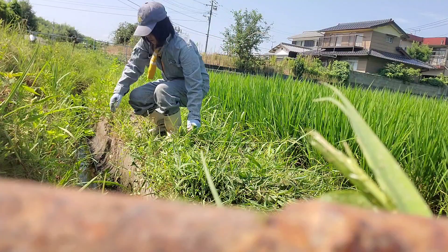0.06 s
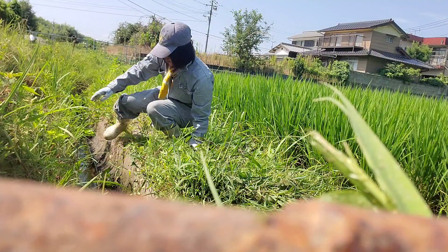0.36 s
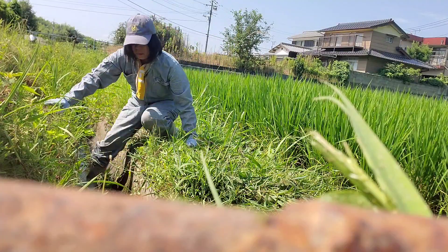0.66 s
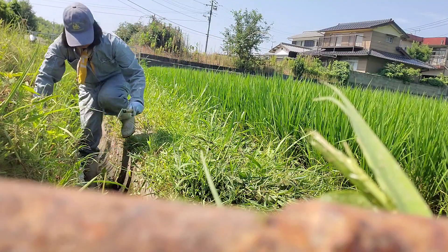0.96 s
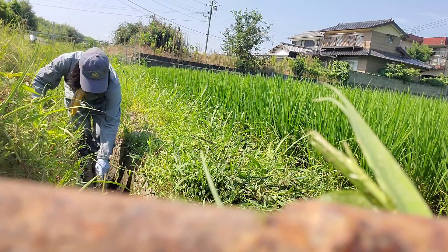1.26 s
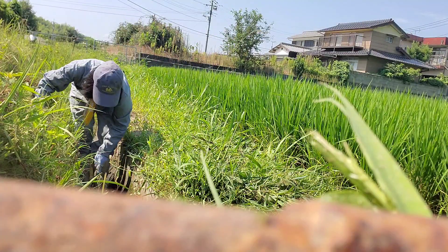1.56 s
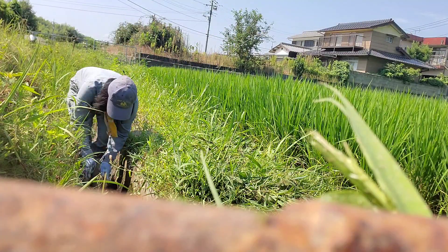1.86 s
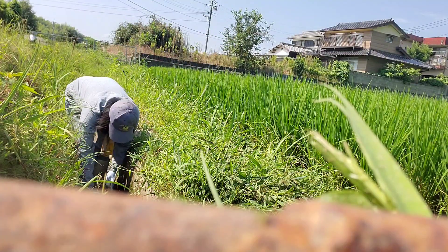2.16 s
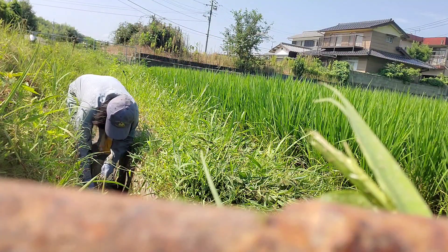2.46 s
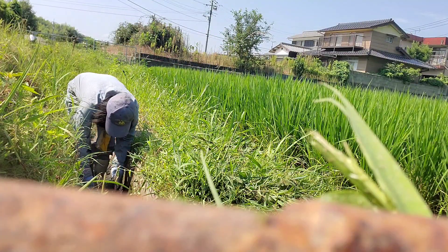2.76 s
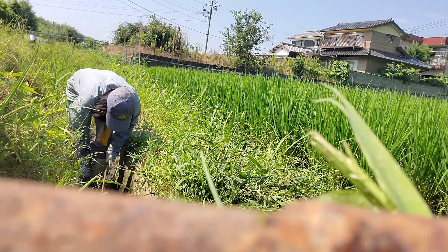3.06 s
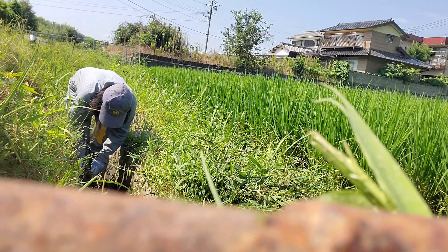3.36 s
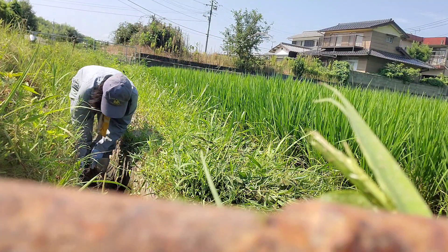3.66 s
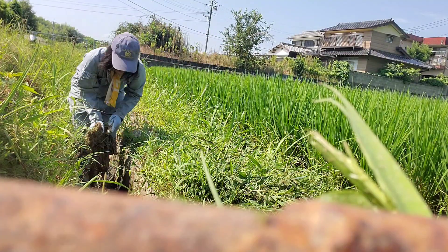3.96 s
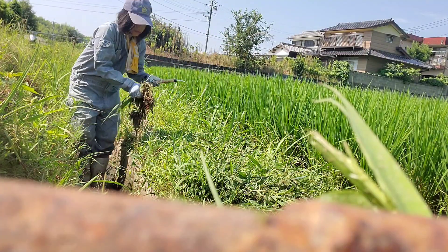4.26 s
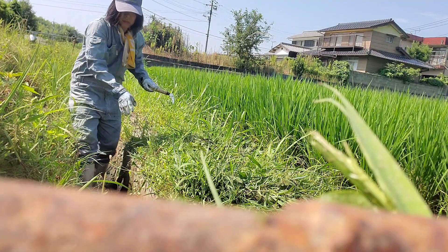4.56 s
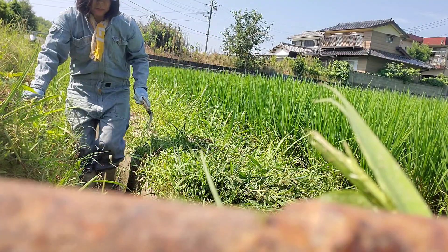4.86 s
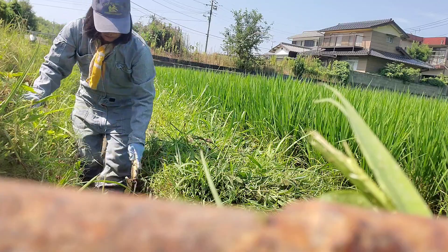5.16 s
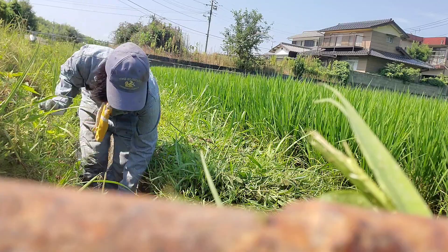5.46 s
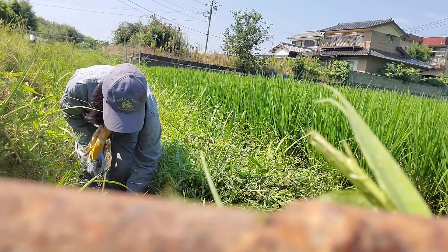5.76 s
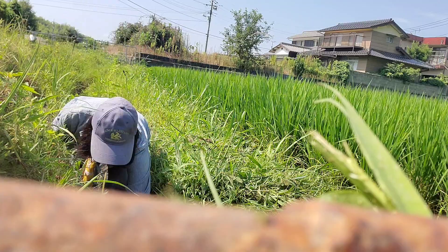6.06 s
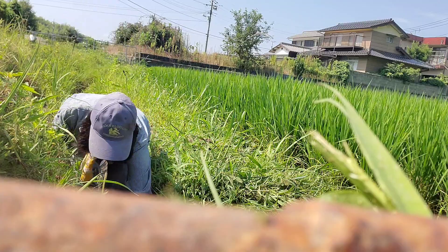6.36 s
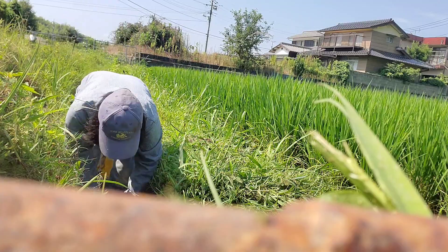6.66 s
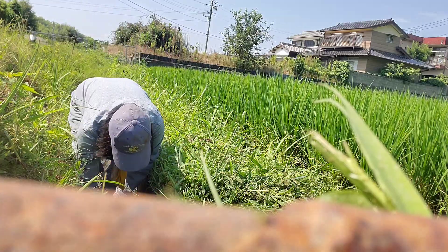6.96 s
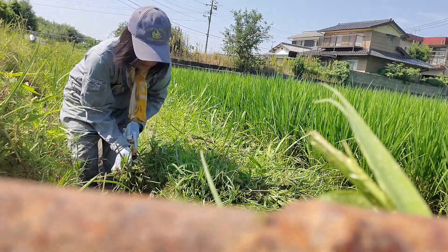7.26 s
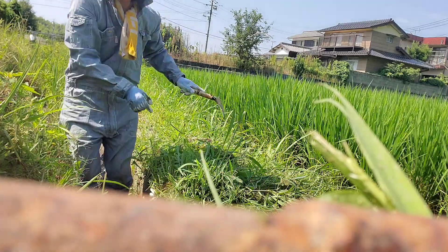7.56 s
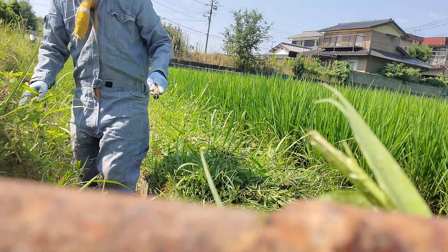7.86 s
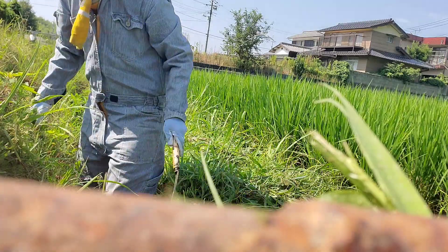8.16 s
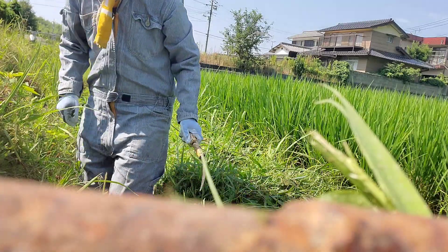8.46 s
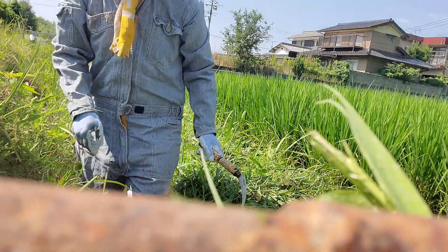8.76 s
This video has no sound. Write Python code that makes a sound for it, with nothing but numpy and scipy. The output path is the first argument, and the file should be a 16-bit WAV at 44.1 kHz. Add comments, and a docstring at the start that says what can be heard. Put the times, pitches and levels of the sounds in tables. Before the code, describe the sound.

A soft, high cicada chorus hisses throughout in wide stereo, with a cricket rasping in quick pulses and a faint town rumble far off. A few metres away, slightly left, a sickle works in a muddy ditch with almost no echo. After a faint rustle and a soft boot thud around 1 second, short tearing cuts and crisp stalk snaps begin at 1.5 seconds. The loudest cluster comes at 2.4 seconds with a wet squelch, and another sharp snap at 3.5. From 4 to 5.4 seconds there are only quiet sloshes, bubbly pops and dull thuds. Snaps return at 5.6 and 5.9, followed by longer rips and a strong double snap at 6.8. Small squelches follow, then lighter snaps at 8 and 8.5 with soft muddy steps. One cicada's thin whine swells from 1.3 to 2.9 seconds and again from 8.

```python
"""A sickle clears a muddy ditch beside a rice field, a few metres from a stereo pair in the open air.
Each pull tears wet stalks and crackles the leaves, and thick stalks snap with a brief ring.
Boots thud on the soft bank and slosh through the mud, where air pockets open with a squelch.
Cicadas hiss and whine all around, a bush cricket rasps its wings about eleven times a second,
and a far town rumbles underneath."""
import sys
import numpy as np
from scipy import signal
from scipy.fft import rfft, irfft, next_fast_len
from scipy.io import wavfile

SR = 44100
rng = np.random.default_rng(int(sys.argv[2]) if len(sys.argv) > 2 else 0)


def digitize_waveform(pressure):
    """Quantize a signal to 16-bit integers and store it at the path in sys.argv[1].

    Rows of a 2-D input are taken as channels; values are limited to [-1, 1].
    """
    field = np.atleast_2d(pressure).T
    bounded = np.clip(field, -1, 1)
    quanta = np.round(bounded * 32767).astype(np.int16)
    wavfile.write(sys.argv[1], SR, quanta)


N = 392931
TIME = np.arange(N) / SR

# spectrum of the cicada chorus across the field: (frequency [Hz], gain [dB])
CHORUS_SPECTRUM = [(1200, -29), (1800, -18), (2350, -4.5), (3050, -2), (3650, -4), (4300, -2.5),
                   (4950, -1.5), (5900, -12), (7100, -10), (8100, -6.5), (9200, -14), (10300, -20.5),
                   (12500, -23), (15500, -26.5)]
# slow swell of that chorus: (time [s], base level [dB])
CHORUS_SWELL = [(0.0, -57.5), (0.79, -58), (2.38, -58.5), (2.6, -57), (3.79, -56), (8.9, -57)]
# buzz of the cicada nearest the microphones: (time [s], level [dB], centre [Hz])
NEAR_BUZZ = [(0, -63.5, 8140), (1.3, -67.5, 8040), (2.8, -66, 8240), (3.8, -62, 8910), (5.2, -64.5, 8670),
             (6.1, -62, 7900), (7.3, -66.5, 7900), (8.9, -73, 8100)]
# single cicadas standing out of the chorus: (pitch [Hz], width [Hz], level [dB])
SOLO_VOICES = [(3016, 95, -67), (3267, 43, -69), (4710, 93, -73)]
# the bush cricket's song: (time [s], chirp rate [1/s], relative level [dB])
CRICKET_SONG = [(0, 10, -7.5), (3, 12.3, 3.5), (4.8, 10.4, 5.5), (6.4, 10.8, -1), (7.6, 11.9, 1.5),
                (8.9, 11.3, -14)]
# resonances of the cricket's wings: (frequency [Hz], width [Hz], gain [dB])
WING_MODES = [(5150, 800, 0), (9350, 1200, -4.5), (12000, 5000, -22)]
# spectrum of the town, heard from far off: (frequency [Hz], gain [dB])
TOWN_SPECTRUM = [(20, -2), (42, -11.5), (64, -3.5), (85, -1), (125, -7.5), (220, -12), (380, -15),
                 (550, -23.5), (800, -45.5), (1300, -22.5), (2500, -67)]
# rise and fall of the town: (time [s], rumble gain [dB], drone gain [dB])
TOWN_SWELL = [(0, -2, 0.5), (1.3, 0.5, 5.5), (2.8, -0.5, 5), (3.6, -0.5, -1), (8.9, -0.5, -15.5)]
# spectra of wet mud, tearing stalks and crackling leaves: (frequency [Hz], gain [dB])
MUD_SPECTRUM = [(110, 4), (260, 5), (420, 1.5), (600, 0.5), (1050, 3), (1400, 1), (1750, 7.5), (2300, -1),
                (3500, -32)]
STALK_SPECTRUM = [(1300, -36), (2000, -16), (2700, -4.5), (3300, -3.5), (4000, 4), (4700, -3.5), (5300, -3),
                  (6100, -21.5), (8000, -38)]
LEAF_SPECTRUM = [(4500, -29), (6200, -1), (7800, -9), (9000, -9), (10000, -4), (11500, -2), (13000, -9),
                 (15500, -7.5)]
# the sickle draws through a tuft: (time of peak [s], length [s], stalks [dB], mud [dB], leaves [dB])
SICKLE_PULLS = [(0.803, 0.029, -57.5, -64.5, -57), (1.574, 0.059, -34.5, -45.5, -47),
                (1.908, 0.044, -39, -50, -51.5), (2.455, 0.067, -33.5, -48.5, -46.5),
                (3.003, 0.046, -42, -55, -47.5), (3.246, 0.068, -46.5, -56, -55.5),
                (3.748, 0.037, -44, -62, -56), (5.748, 0.034, -46.5, -56, -63.5),
                (5.908, 0.049, -41.5, -55, -50.5), (6.322, .11, -34, -47, -51.5),
                (6.627, 0.18, -33.5, -46, -52.5), (6.841, 0.054, -33.5, -45.5, -47),
                (8.197, 0.033, -53.5, -75, -68)]
# boots and clods land on soft ground: (time [s], level [dB], length [s], centre [Hz])
GROUND_THUDS = [(1.026, -54.5, 0.063, 158), (1.598, -54.5, 0.089, 217), (1.622, -47.5, .051, 65),
                (4.747, -46, .03, 157), (5.203, -53, 0.065, 108), (5.311, -49, 0.053, 93),
                (6.603, -44.5, 0.031, 188), (8.183, -56, 0.023, 195), (8.494, -63, .064, 185),
                (8.867, -52.5, 0.045, 209)]
# a small cicada's thin calls: (start [s], end [s], level at the end [dB], pitch [Hz])
WHINE_CALLS = [(1.302, 2.897, -63.5, 6320), (7.953, 8.95, -64, 6500)]
# boots and hands work the wet mud: (time of peak [s], length [s], mud level [dB])
MUD_SLOSHES = [(1.429, 0.077, -66.5), (1.718, 0.13, -69.5), (1.995, 0.057, -66.5), (2.655, 0.061, -61),
               (2.805, 0.094, -61.5), (3.053, 0.074, -57.5), (4.42, .12, -64), (4.762, 0.099, -55.5),
               (5.72, 0.14, -65.5), (5.997, 0.12, -60.5), (6.472, .025, -60), (6.882, 0.083, -60.5),
               (7.491, .18, -67), (8.528, 0.11, -61.5), (8.857, 0.06, -61)]
# the largest air pockets opening in mud and ditch water: (time [s], level [dB], pitch [Hz])
LARGE_POCKETS = [(1.415, -48.5, 694), (1.436, -44, 328), (1.762, -53, 960), (1.998, -46, 383),
                 (2.420, -25, 1189), (2.440, -25, 1076), (2.452, -30.5, 408), (2.859, -50, 432),
                 (2.990, -34, 249.4), (3.166, -53, 1330), (3.475, -47.5, 357), (4.385, -54, 765),
                 (4.633, -52, 503), (4.704, -43, 288), (4.746, -42, 1270), (5.162, -55, 592),
                 (5.799, -48.5, 805), (5.866, -41, 1490), (5.975, -44.5, 317), (6.008, -48, 1120),
                 (6.877, -45, 1300), (7.402, -48.5, 1190), (7.498, -44, 1004), (7.656, -52, 1085),
                 (8.489, -37.5, 271), (8.551, -45, 770)]
# the blade chops a thick stalk: (time [s], level [dB], ring [Hz], mud [dB], leaves [dB])
STALK_SNAPS = [(1.552, -32, 3500, -44, -58), (1.878, -28.5, 4100, -35.5, -42),
               (1.905, -22, 3870, -44.5, -48), (2.431, -16.5, 4880, -35, -43), (2.447, -17, 4200, -40, -40),
               (2.971, -34, 3930, -44.5, -36.5), (3.451, -16.5, 5250, -32, -34),
               (3.462, -19.5, 5750, -43, -39), (3.670, -34, 6160, -68, -38), (5.576, -22.5, 4600, -42, -66),
               (5.871, -26, 4700, -50, -48), (6.800, -18, 3900, -41, -57), (6.824, -17, 4000, -57, -57),
               (8.016, -30, 4520, -55, -54), (8.486, -29.5, 4070, -41.5, -61)]


def undb(db):
    """Decibels to gain."""
    return 10 ** (np.asarray(db) / 20)


def unit(x):
    """Scale to rms 1."""
    return x / np.sqrt(np.mean(x ** 2) + 1e-20)


def curves(table):
    """The columns of a table, joined by straight lines in time."""
    times, *columns = np.transpose(table)
    return [np.interp(TIME, times, column) for column in columns]


def pan(db):
    """Gains that make the left microphone louder than the right by db."""
    return undb(np.array([[db], [-db]]) / 2)


def colour(x, spectrum):
    """Filter by a spectrum of (frequency [Hz], gain [dB]) points."""
    hz, db = np.transpose(spectrum)
    size = next_fast_len(x.shape[-1])
    bins_hz = np.maximum(np.fft.rfftfreq(size, 1 / SR), 1)
    gain = undb(np.interp(np.log(bins_hz), np.log(hz), db))
    return irfft(rfft(x, size) * gain, size)[..., :x.shape[-1]]


def low_cut(x, hz, order=1):
    """Roll off the bass below hz."""
    return signal.sosfilt(signal.butter(order, hz, "high", fs=SR, output="sos"), x)


def resonate(x, hz, width_hz):
    """A resonance applied twice, for steep skirts."""
    b, a = signal.iirpeak(hz, hz / width_hz, SR)
    return signal.lfilter(b, a, signal.lfilter(b, a, x))


def wander(rate_hz):
    """A random curve with a spread near 1."""
    steps = rng.standard_normal(2048)
    return np.interp(TIME * rate_hz, np.arange(len(steps)), steps)


def narrow_noise(hz, width_hz):
    """Stereo noise in a narrow band around a moving pitch."""
    lowpass = signal.butter(2, width_hz / 2, fs=SR, output="sos")
    slow = signal.sosfilt(lowpass, rng.standard_normal((2, 2, N)))
    carrier = np.exp(2j * np.pi * np.cumsum(hz) / SR)
    return unit(np.real((slow[0] + 1j * slow[1]) * carrier))


def grains(per_s, spread_db, band_hz, q, pitches=16):
    """Tiny breaks at random moments, a few large among many small, each ringing at one of the pitches."""
    sizes = undb(spread_db * np.minimum(rng.exponential(size=N), 4))
    breaks = (rng.random(N) < per_s / SR) * sizes * rng.choice([-1, 1], N)
    pitch = rng.integers(pitches, size=N)
    return sum(signal.lfilter(*signal.iirpeak(hz, q, SR), breaks * (pitch == k))
               for k, hz in enumerate(np.geomspace(*band_hz, pitches)))


def add(out, s, sound):
    """Mix a sound in at s seconds."""
    start = max(int(s * SR), 0)
    part = sound[..., :max(N - start, 0)]
    out[..., start:start + part.shape[-1]] += part


def cicada_chorus(boost_db=2.5, flutter_db=1.6, bands=9):
    """Cicadas all round the microphones flutter apart, deep ones to the right, shrill ones to the left."""
    size = next_fast_len(N)
    spectrum = rfft(unit(colour(rng.standard_normal((2, N)), CHORUS_SPECTRUM)), size)
    hz = np.fft.rfftfreq(size, 1 / SR)
    centres_hz = np.linspace(2300, 6100, bands)
    voices = 0
    for k, centre in enumerate(centres_hz):
        band = irfft(spectrum * np.interp(hz, centres_hz, np.eye(bands)[k]), size)[:, :N]
        side_db = np.interp(centre, [2800, 4000, 6000], [-1.2, 3.2, 2.0])
        flutter = undb(flutter_db * wander(30) * (k < bands - 1))  # the top band stays smooth
        voices += band * pan(side_db) * flutter
    swell_db, = curves(CHORUS_SWELL)
    return undb(swell_db + boost_db) * voices


def near_cicada(tymbal_hz=93.5, depth=0.6):
    """The nearest cicada buzzes, pulsing with its tymbals."""
    db, hz = curves(NEAR_BUZZ)
    pulse_hz = tymbal_hz * (1 + 0.002 * wander(3.3))
    pulse = 1 + depth * np.sin(2 * np.pi * np.cumsum(pulse_hz) / SR)
    buzz = narrow_noise(hz, 1800) + 0.5 * narrow_noise(hz, 140)
    return undb(db) * unit(pulse * buzz)


def solo_cicadas():
    """A few cicadas swell and waver on their own notes."""
    return sum(undb(db + 1.8 * wander(3)) * narrow_noise(hz * (1 + 0.012 * wander(7)), width_hz)
               for hz, width_hz, db in SOLO_VOICES)


def bush_cricket(db=-64.5):
    """Near centre, each wing stroke rasps across the file in a short chirp, some weaker than others."""
    rate_hz, effort_db = curves(CRICKET_SONG)
    strokes = np.cos(np.pi * np.cumsum(rate_hz) / SR) ** 2
    rasp = rng.standard_normal((2, N))
    wings = sum(undb(mode_db) * resonate(rasp, hz, width_hz) for hz, width_hz, mode_db in WING_MODES)
    return undb(db + effort_db + 3.2 * wander(9)) * unit(wings * strokes) * pan(0.6)


def far_town(rumble_db=-68, drone_db=-67, drone_hz=63):
    """A wide, distant rumble, leaning left, with a low drone that comes and goes."""
    rumble_swell_db, drone_swell_db = curves(TOWN_SWELL)
    rumble_gain = undb(rumble_db + rumble_swell_db + 0.92 * wander(3.3))
    rumble = rumble_gain * unit(colour(rng.standard_normal((2, N)), TOWN_SPECTRUM))
    drone = undb(drone_db + drone_swell_db) * narrow_noise(np.full(N, drone_hz), 12)
    return (rumble + drone) * pan(2.8)


def ditch(sound, pan_db, scatter_db=4.5, scatter_s=0.0038, lag_s=0.00012, sway_hz=12):
    """The path to the microphones, the left one nearer: banks and shaken grass scatter the sound."""
    t = TIME[:SR // 50]
    sound = np.pad(sound, (0, len(t)))
    age = np.arange(len(sound)) / SR
    direct = np.array([sound, np.interp(age - lag_s, age, sound)])
    paths = unit(rng.standard_normal((2, 2, len(t))) * np.exp(-t / scatter_s)) / np.sqrt(len(t))
    paths = low_cut(paths, 900)  # long waves pass straight through
    one, other = (signal.fftconvolve(direct, path, axes=-1)[:, :len(sound)] for path in paths)
    sway = 2 * np.pi * sway_hz * age  # the echoes change as the grass moves
    heard = direct + undb(scatter_db) * (np.cos(sway) * one + np.sin(sway) * other)
    return heard * np.std(sound) / np.std(heard, axis=1, keepdims=True) * pan(pan_db)


def mud_froth(rest_db=-85.5, stir_db=-22, settle_s=0.27, flicker_db=5.5):
    """Tiny bubbles seep from the mud, froth up around each slosh, then settle."""
    stir = sum(undb(db + stir_db) * np.exp(-np.abs(TIME - s) / settle_s) for s, _, db in MUD_SLOSHES)
    bubbles = unit(colour(grains(per_s=260, spread_db=2.5, band_hz=(280, 1900), q=15), MUD_SPECTRUM))
    flicker = undb(flicker_db * wander(14))
    return ditch(bubbles * (undb(rest_db) + stir) * flicker, pan_db=1.5)[:, :N]


def work_textures():
    """Wet mud, tearing stalks and crackling leaves, uneven as the blade catches and slips."""
    mud = colour(grains(per_s=1400, spread_db=3.4, band_hz=(223, 2008), q=7.6), MUD_SPECTRUM)
    stalks = colour(grains(per_s=5000, spread_db=3.2, band_hz=(1900, 6200), q=11), STALK_SPECTRUM)
    leaves = colour(grains(per_s=1800, spread_db=5.2, band_hz=(5800, 15500), q=6), LEAF_SPECTRUM)
    return np.array([mud, stalks, leaves]) * undb(1.5 * wander(160))


def tear(textures, envelope, levels_db):
    """Mud, stalks and leaves under one envelope, each at its own rms level."""
    first = int(rng.random() * (N - SR))
    return sum(undb(db) * unit(texture[first:first + len(envelope)] * envelope)
               for db, texture in zip(levels_db, textures))


def pull(peak_s, length_s, rise_share=0.63, grip=0.1, level_off_s=0.11):
    """Start time and envelope of a pull: tension builds, then lets go; long pulls level off."""
    tension = np.interp(np.linspace(0, 1, int(length_s * SR)), [0, rise_share, 1], [grip, 1, 0])
    return peak_s - rise_share * length_s, np.tanh(tension * length_s / level_off_s)


def sickle_cuts(textures):
    """A few metres off, left of centre, the blade tears through a tuft of stalks and leaves."""
    out = np.zeros((2, N))
    mud, stalks, leaves = textures
    surface = low_cut(mud, 550)  # only the surface of the mud is stirred
    for s, length_s, stalks_db, mud_db, leaves_db in SICKLE_PULLS:
        start, envelope = pull(s, length_s)
        cut = tear((surface, stalks, leaves), envelope, (mud_db, stalks_db, leaves_db))
        add(out, start, ditch(cut, pan_db=3.5))
    return out


def thuds(stereo_spread=1.3):
    """To the left, soft ground takes a weight with a short, dull push that spreads through the bank."""
    out = np.zeros((2, N))
    for s, db, length_s, hz in GROUND_THUDS:
        age = TIME[:SR // 4] / length_s
        envelope = age * np.exp(-3 * age)
        push = rng.standard_normal(len(age)) + stereo_spread * rng.standard_normal((2, len(age)))
        earth = unit(resonate(push, hz, 0.64 * hz) * envelope)
        crest = envelope.max() / np.sqrt(np.mean(envelope ** 2))
        add(out, s, undb(db) * earth / crest)
    return out * pan(4.7)


def whining_cicada(swell_db_per_s=4.5, fade_s=0.15):
    """A small cicada swells on one thin note, then breaks off."""
    out = 0
    for start, end, db, hz in WHINE_CALLS:
        gate = np.interp(TIME, [start, start + fade_s, end, end + fade_s], [0, 1, 1, 0])
        swell_db = swell_db_per_s * np.minimum(TIME - end, 0)
        out += gate * undb(db + swell_db) * narrow_noise(hz * (1 + 0.003 * wander(8)), 300)
    return out


def sloshes(textures, stalks_db=2.5, leaves_db=-8):
    """A boot or hand drags through the mud and brushes the plants beside it."""
    out = np.zeros((2, N))
    for s, length_s, db in MUD_SLOSHES:
        start, envelope = pull(s, length_s)
        slosh = tear(textures, envelope, (db, db + stalks_db, db + leaves_db))
        add(out, start, ditch(slosh, pan_db=1))
    return out


def small_pockets(per_slosh=2, over_mud_db=7.5, strays=14, stray_db=-66, band_hz=(446, 1788)):
    """Air pockets freed by sloshes or rising by themselves: (time [s], level [dB], pitch [Hz])."""
    freed = [(s + length_s * rng.uniform(-0.56, 0.56), db + over_mud_db, rng.uniform(*band_hz))
             for s, length_s, db in MUD_SLOSHES for _ in range(per_slosh)]
    rising = [(rng.uniform(0, N / SR), stray_db, rng.uniform(*band_hz)) for _ in range(strays)]
    return freed + rising


def squelches(swell_s=0.008, glide=0.06, froth_db=-9, froth_s=0.014):
    """Each air pocket swells and rises in pitch as it opens, in a froth of smaller bubbles."""
    out, t = np.zeros((2, N)), TIME[:SR // 8]
    bubbles = grains(per_s=1300, spread_db=6.3, band_hz=(193.7, 2336), q=9.9)
    froth_envelope = (t / froth_s * np.exp(1 - t / froth_s)) ** 2
    for s, db, hz in LARGE_POCKETS + small_pockets():
        age = t / (swell_s * (1000 / hz) ** 0.039)  # large pockets ring longer
        rising_hz = hz * (1 + glide * np.tanh(age - 1))
        pocket = (age * np.exp(1 - age)) ** 2 * np.sin(2 * np.pi * np.cumsum(rising_hz) / SR)
        first = rng.integers(N - len(t))
        froth = unit(resonate(bubbles[first:first + len(t)], hz, 0.64 * hz)) * froth_envelope
        squelch = undb(db) * (pocket + undb(froth_db) * froth) / np.sqrt(2)
        add(out, s, ditch(squelch, pan_db=1.7))
    return out


def stalk_snaps(textures, burst_s=0.0011, width_hz=2000, crack_db=-21, fibres_db=-12.5, fibres_s=0.0092):
    """A thick stalk breaks in a short burst that rings briefly; its last fibres tear after it."""
    out, t = np.zeros((2, N)), TIME[:SR // 20]
    dying = np.exp(-t / fibres_s)
    for s, db, hz, mud_db, leaves_db in STALK_SNAPS:
        burst = rng.standard_normal(len(t)) * np.exp(-t / burst_s)
        crack = low_cut(burst, 1200, order=2)  # a stalk is too thin to radiate long waves
        snap = resonate(burst, hz, width_hz) + undb(crack_db) * crack
        snap *= undb(db) / np.abs(snap).max()
        fibres = tear(textures, dying, (mud_db, db + fibres_db, leaves_db)) * np.sqrt(np.mean(dying ** 2))
        add(out, s, ditch(snap + fibres, pan_db=4, scatter_db=-0.5))
    return out


def open_field(work, echo_db=-29, decay_s=0.014):
    """The open field returns only a faint, short echo to the microphones."""
    t = TIME[:SR // 4]
    echo = unit(rng.standard_normal((2, len(t))) * np.exp(-t / decay_s)) / np.sqrt(len(t))
    return work + undb(echo_db) * signal.fftconvolve(work, echo, axes=-1)[:, :N]


def scene():
    """Insects all around, the town far off, and the work in the ditch a few metres away."""
    ambience = cicada_chorus() + near_cicada() + solo_cicadas() + bush_cricket() + far_town()
    textures = work_textures()
    work = mud_froth() + sickle_cuts(textures) + thuds()
    work += sloshes(textures) + squelches() + stalk_snaps(textures)
    return ambience + whining_cicada() + open_field(work)


def record(dry):
    """The recorder cuts the treble steeply above 15.9 kHz."""
    return signal.sosfilt(signal.ellip(10, 0.2, 70, 15900, fs=SR, output="sos"), dry)


dry = scene()
out = record(dry)
digitize_waveform(out)
```